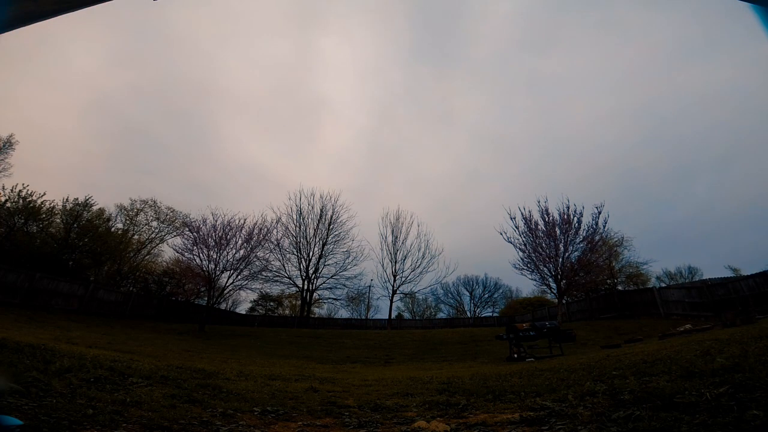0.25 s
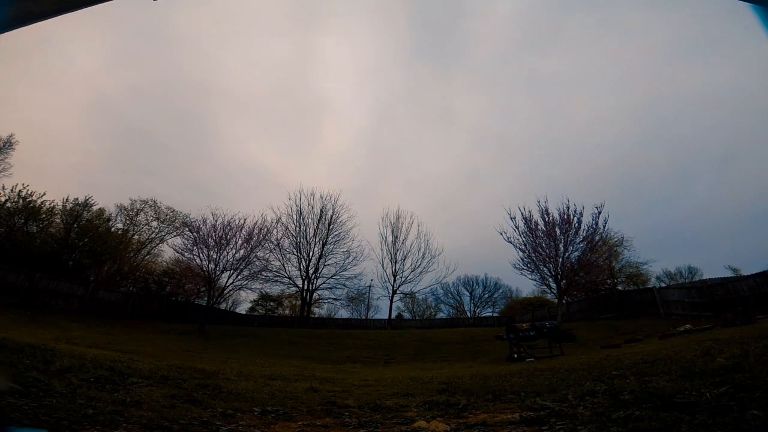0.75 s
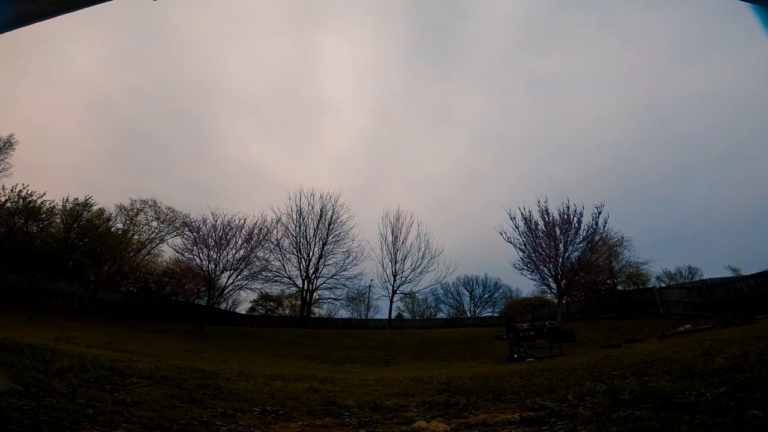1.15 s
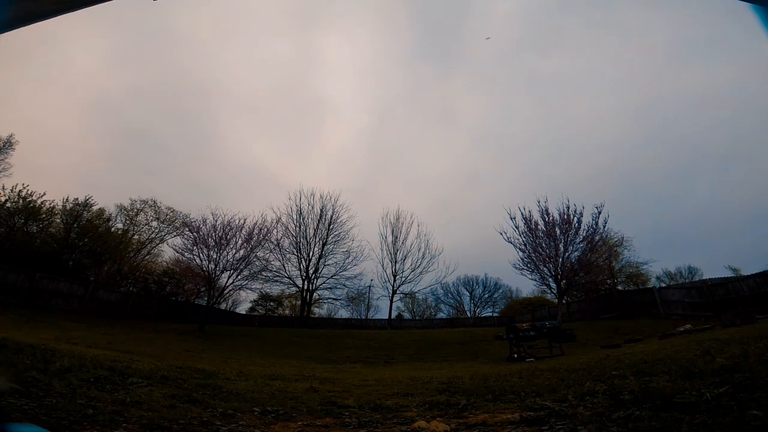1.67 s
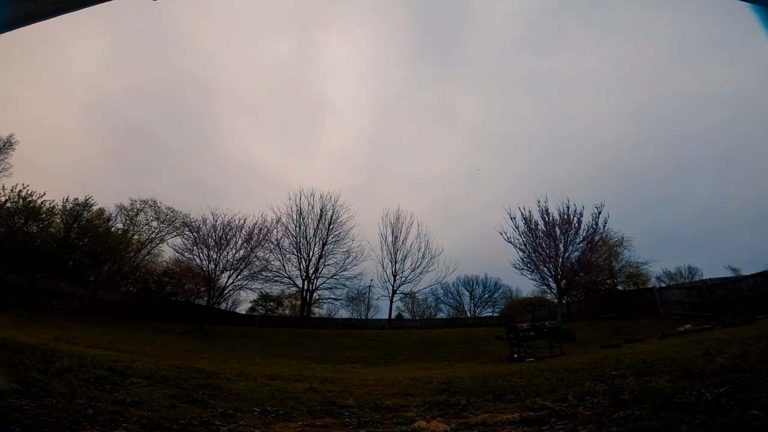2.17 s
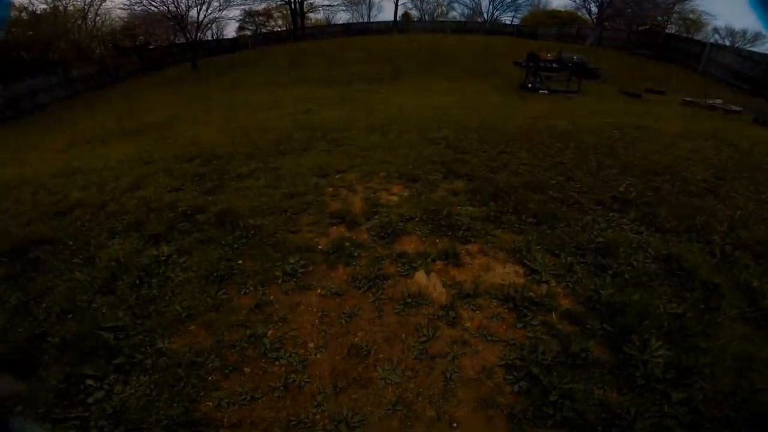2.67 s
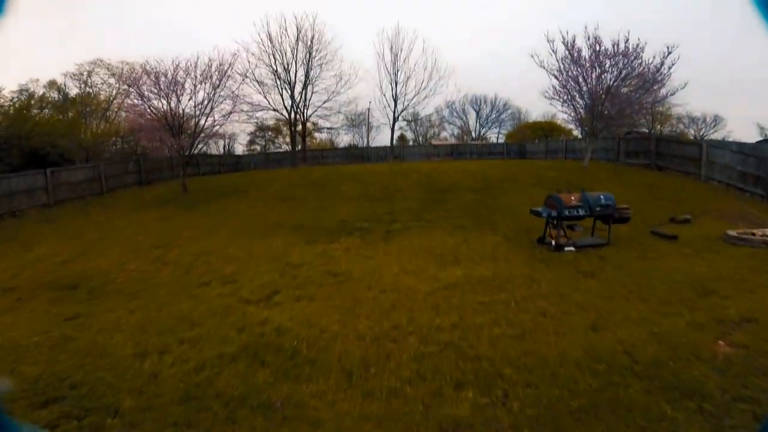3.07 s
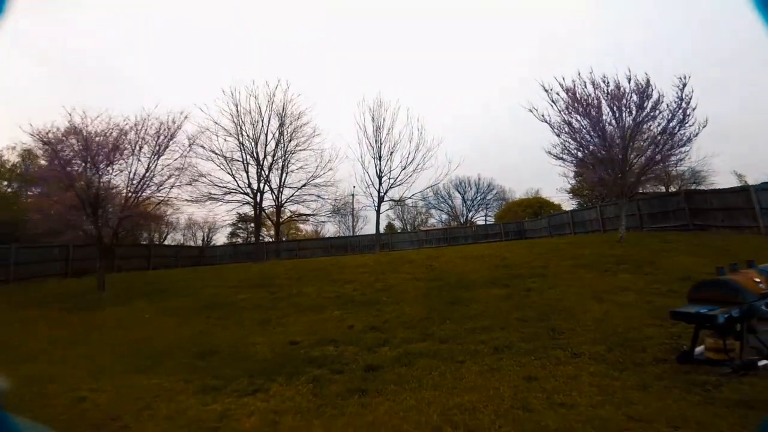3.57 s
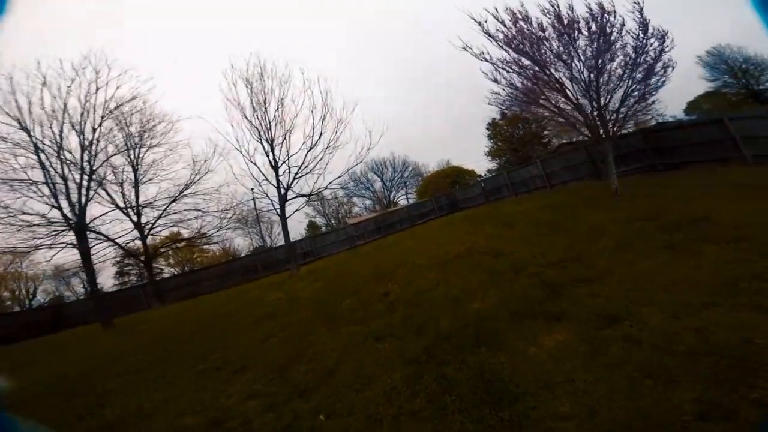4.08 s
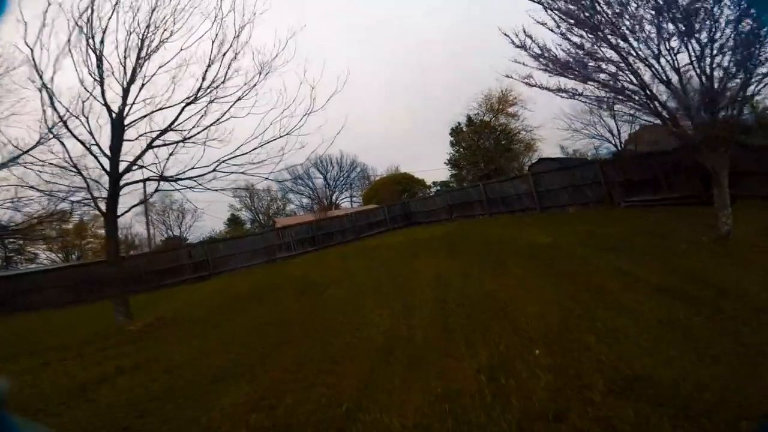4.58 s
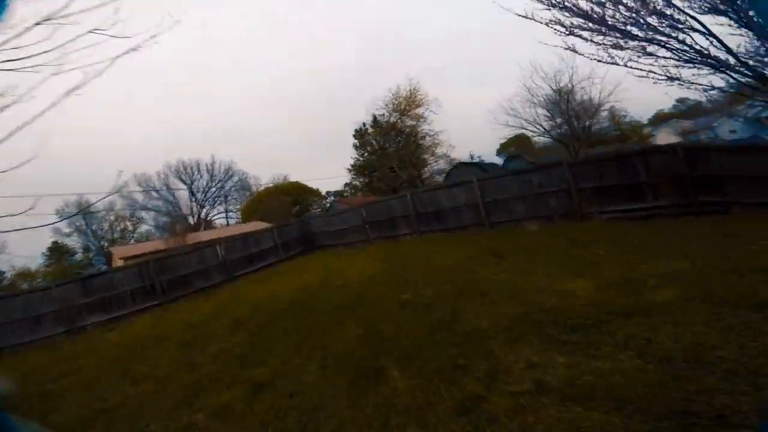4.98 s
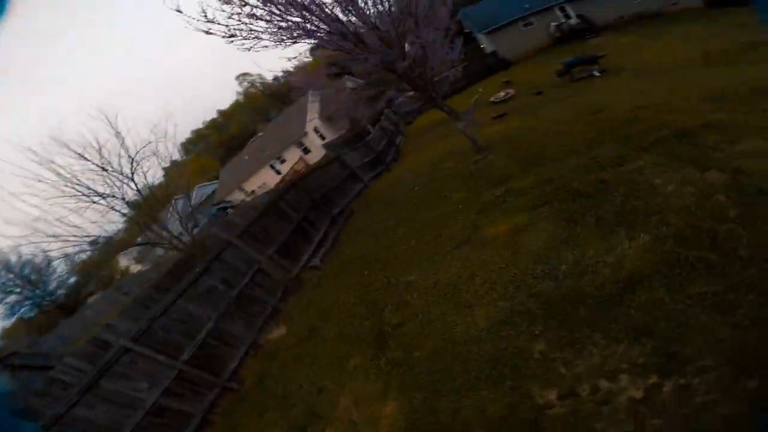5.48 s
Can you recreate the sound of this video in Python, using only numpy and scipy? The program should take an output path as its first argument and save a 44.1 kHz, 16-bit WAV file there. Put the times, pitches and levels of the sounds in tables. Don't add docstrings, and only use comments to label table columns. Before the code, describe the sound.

A small four-rotor drone ticks and squeals to life, rattles at idle on grass, then blasts off into a loud whining, swooping flight.

```python
import sys
import numpy as np
from scipy import signal
from scipy.io import wavfile
from scipy.ndimage import uniform_filter1d, minimum_filter1d

SR = 44100
rng = np.random.default_rng(int(sys.argv[2]) if len(sys.argv) > 2 else 0)


def voltage_ratio(decibels):
    exponent = np.asarray(decibels, float) / 20
    return 10 ** exponent


def store_wav(level_fs):
    pcm = np.round(np.clip(np.atleast_2d(level_fs), -1, 1) * 32767)
    wavfile.write(sys.argv[1], SR, pcm.T.astype(np.int16))


N = 253024
TIME = np.arange(N) / SR
GROUND, FLIGHT = slice(0, int(2.5 * SR)), slice(int(2.2 * SR), N)
LIFT_S = 2.33

# (time [s], nearest shaft [Hz], second shaft [Hz], third shaft [Hz], hum level [dB])
PUNCH_SPEEDS = [
    (2.275, 48, 55, 48, -36),
    (2.328, 100, 185, 140, -18),
    (2.375, 254, 230, 190, -13),
    (2.44, 308, 305, 262, -20),
    (2.505, 319, 345, 299, -14),
    (2.56, 292, 299, 297, -17),
    (2.64, 206, 205, 232, -22),
    (2.7, 185, 185, 222, -11),
    (2.765, 150, 162, 196, -22),
]
# (time [s], shaft speed [Hz], hum level [dB])
NEAR_MOTOR = [(2.845, 235.7, -3), (2.915, 268.9, -20), (3.17, 121.6, -21), (3.34, 196, -14),
              (3.53, 234.3, -7), (3.678, 288.7, -13.5), (3.84, 156, -16), (3.94, 139.1, -36),
              (4.06, 195.8, -6), (4.218, 237, -14), (4.45, 187.6, -15), (4.62, 228.4, -3.5),
              (4.79, 236.5, -20), (5.07, 186, -17.5), (5.2, 228, -11.5), (5.5, 261.8, -26.5),
              (5.57, 235.3, -15), (5.67, 278, -21.5)]
# (time [s], second shaft [Hz], its hum [dB], third shaft [Hz], its hum [dB])
FAR_MOTORS = [(2.9, 236.3, -6.5, 241.3, -30), (3.059, 215.1, -13.5, 171, -12.5),
              (3.19, 135.9, -32, 114.9, -17), (3.36, 224.1, -11, 177.3, -43),
              (3.57, 270.8, -15, 217.3, -37), (3.66, 317.8, -3.5, 265, -31),
              (3.9, 149.5, -16.5, 153.4, -31), (4.05, 200.8, -0.5, 216.7, -42), (4.2, 239.2, -9, 254, -6),
              (4.42, 202.1, -9, 182.6, -17), (4.7, 254.3, -11, 214.7, -17.5), (4.86, 238, -1.5, 249.1, -8),
              (5.0, 218.9, -3, 251.9, -43), (5.15, 243, -11.5, 286.5, -18.5), (5.35, 235.2, -4, 274.9, -20),
              (5.459, 232.1, -14.5, 171.3, -11), (5.61, 237.7, -10.5, 199.8, -13),
              (5.74, 209.3, -8, 163.6, -34)]


def motors():
    near_punch = [(s, near, db) for s, near, second, third, db in PUNCH_SPEEDS]
    far_punch = [(s, second, db + 5.0, third, db - 11.5) for s, near, second, third, db in PUNCH_SPEEDS]
    return curves(near_punch + NEAR_MOTOR) + curves(far_punch + FAR_MOTORS)


BLADES, SWITCHINGS = 4, 42
# (level at hover [dB], shaft speed [dB per octave], speeding up [dB per octave/s],
# full airspeed [dB], lift-off [dB])
BLADE_LAW = (-24.5, 17, 0.66, -9.5, 5)
BITE_LAW = (1.5, -1, 0, -7, 5)
COIL_LAW = (-50.5, 1.5, -0.5, -12.5, 30.5)
# (multiple [1], level [dB], roughness [0-1])
NEAR_OVERTONES = [(2, -20.5, 0.24), (3, -18.5, 0), (5, -36, 0.8), (8, -25.5, 0.45), (12, -29.5, 0.2),
                  (16, -36, 0)]
# (multiple [1], level [dB], roughness [0-1])
FAR_OVERTONES = [(2, -31.5, 0.23), (3, -33, 0), (4, -34, 0.77), (8, -43.5, 0.98), (12, -46, 1),
                 (16, -60.5, 0.5)]
# (time [s], half width [s], level [dB])
HUM_LULLS = [(2.599, 0.019, -6), (2.752, 0.036, -4.5), (3.139, 0.055, -11), (3.581, 0.029, -10),
             (3.851, 0.059, -2.5), (4.029, 0.034, -9.5), (4.231, .025, -6.5), (4.66, 0.033, -11.5),
             (4.82, 0.034, -19.5), (5.09, 0.042, 1), (5.259, 0.033, -4.5)]


def shafts(hz, hum_db, hz_2, hum_2_db, hz_3, hum_3_db):
    blade_db, bite_db, coil_law_db = levels(hz, BLADE_LAW, BITE_LAW, COIL_LAW)
    lull_db = sum(db * bump(s, half_s, half_s) for s, half_s, db in HUM_LULLS)
    hz, hz_2, hz_3 = (speed * (1 + 0.0111 * wander(16.74)) for speed in (hz, hz_2, hz_3))
    blade_tone = voltage_ratio(blade_db) * tone(BLADES * hz, rough=0.13)

    upper = np.zeros(N)
    for k, db, rough in NEAR_OVERTONES:
        level_db = 0.64 * blade_db + db + bite_db * (k > BLADES)
        upper += voltage_ratio(level_db) * tone(k * hz, rough, 10 * k + 40)
    for k, db, rough in FAR_OVERTONES:
        for speed, shake_db in ((hz_2, hum_2_db), (hz_3, hum_3_db)):
            upper += voltage_ratio(db + 0.47 * shake_db) * tone(k * speed, rough, 8 * k + 40)
    housing = voltage_ratio(7.5) * ring(upper, hz=1444, width=130) + voltage_ratio(4.0) * ring(upper, hz=2280, width=300)
    out = blade_tone + upper + housing

    for speed, level_db, coil_db in (hz, hum_db, 0), (hz_2, hum_2_db, -1), (hz_3, hum_3_db, -3):
        out += voltage_ratio(level_db + lull_db) * tone(speed, rough=0.082, flutter_hz=26.9)
        passed = 1 / (1 + (SWITCHINGS * speed / 8800) ** 12)
        coil = tone(SWITCHINGS * speed, rough=0.15, flutter_hz=100)
        out += passed * voltage_ratio(coil_law_db + coil_db) * coil
    return out * gate(2.26, 9, 0.011, 1)


# (hover [dB], shaft speed [dB per octave], speeding up [dB per octave/s], airspeed [dB], lift-off [dB])
WIND_LAW = (-32.5, 15.5, 0.05, 13, 24)
BUZZ_LAW = (-40, -4.5, 0.66, 10.5, 4)
ROAR_LAW = (-34.5, 1, 0, 1.5, 11)
HISS_LAW = (-38, 14, 0.56, 0, 15)
WHISTLE_LAW = (-52, 19, -0.6, 19.5, 12)
# (frequency [Hz], level [dB per Hz])
WIND = [(15, -11.5), (30, -3.5), (70, 3.5), (110, 0.5), (200, 5), (350, -26), (600, -52.5)]
# (frequency [Hz], level [dB per Hz])
BUZZ = [(200, -28), (380, -15.5), (550, 25.5), (800, 9.5), (1100, -6.5), (1400, -31), (1800, -70)]
# (frequency [Hz], level [dB per Hz])
ROAR = [(710, -16), (1200, 6.5), (1300, 6.5), (1630, 0), (2440, 6), (2750, 2), (3460, -16), (4200, -25),
        (5460, -21), (9240, -120)]
# (frequency [Hz], level [dB per Hz])
HISS = [(2000, -20.5), (3400, -5), (4150, -9), (4640, -4.5), (5250, -7.5), (6560, -0.5), (7070, -2.5),
        (9410, -6.5), (12000, -25), (13900, -27.5), (15000, -53)]


def air(hz):
    wind_db, buzz_db, roar_db, hiss_db, whistle_db = levels(
        hz, WIND_LAW, BUZZ_LAW, ROAR_LAW, HISS_LAW, WHISTLE_LAW)
    wind_db = wind_db + 1.8 * wander(4.4)
    buzz_db = buzz_db + 1.9 * wander(3.9)
    wind = voltage_ratio(wind_db + 1.5) * noise(WIND, patchy_db=1.5, flicker_db=1.2, size=2048)
    buzz = voltage_ratio(buzz_db) * noise(BUZZ, patchy_db=2.5, flicker_db=0.8)
    roar = voltage_ratio(roar_db) * noise(ROAR, patchy_db=0.0, flicker_db=2.0)
    hiss = voltage_ratio(hiss_db) * noise(HISS, patchy_db=1.8, flicker_db=0.7)
    whistle = ring(noise(HISS, patchy_db=3.1, flicker_db=0.5), hz=7000, width=2000)
    whistle = voltage_ratio(whistle_db) * evened(ring(whistle, hz=7000, width=2000))
    snaps = (rng.random(N) < 500 / SR) * rng.standard_normal(N) * gate(2.265, 2.39, 0.05, 0.05)
    snaps = signal.sosfilt(signal.butter(6, 7000, fs=SR, output="sos"), snaps)
    crackle = voltage_ratio(-18) * ring(snaps, hz=3600, width=2700) + voltage_ratio(3) * ring(snaps, hz=1800, width=4600)
    gusts = voltage_ratio(0.45 * wander(9.3))
    bright = roar + hiss + whistle + crackle
    return (wind + buzz + gusts * bright) * gate(2.255, 9, 0.014, 1)


# (time [s], share of the fastest [0-1])
AIRSPEED = [
    (2.3, 0),
    (3.9, 0.4),
    (4.6, 0.42),
    (5.2, 0.13),
    (5.5, 0.99),
    (5.74, 0.94),
]


def levels(hz, *laws):
    octaves = np.log2(hz / 230)
    push = np.clip(uniform_filter1d(np.gradient(octaves) * SR, size=1500), -8, 8)
    blast = bump(LIFT_S, rise_s=0.06, fall_s=0.08)
    airspeed = columns(AIRSPEED, 0.1)[0]
    return np.array(laws) @ [np.ones(N), np.maximum(octaves, -1), push, airspeed, blast]


IDLE_SHAFTS = [45.66, 46.08, 46.04, 43.53]
# (frequency [Hz], level [dB])
IDLE_TONES = [(1577, -55.5), (1868, -47), (1900, -45), (2169, -47.5), (2196, -48.5), (3639, -59),
              (3763, -56), (3790, -68), (4231, -66), (4549, -64), (4700, -68.5), (5173, -70), (5685, -82),
              (6110, -68.5), (6368, -68.5), (7278, -66)]
# (frequency [Hz], width [Hz], level [dB])
FRAME = [(169.7, 15.7, 2), (238, 11.9, -2), (263.8, 24, -4.5), (352.8, 10.8, -11.5), (407.3, 21, -12.5),
         (553.5, 92, -6.5), (615.2, 89.5, -5.5), (686.3, 140, -11), (762, 43, -24), (852, 48, -26.5),
         (938, 22, -39), (1300, 65, -23.5)]
# (frequency [Hz], level [dB per Hz])
GRIT = [(530, -35), (900, 6), (1120, -27.5), (1330, -6.5), (1740, -5), (1890, -2.5), (2030, -24),
        (2220, -5), (2680, -11), (3760, -18.5), (4000, -27.5), (4570, -30.5), (7560, -25), (10500, -46.5),
        (13600, -72), (22000, -120)]


def idle():
    speed = 1 - 0.34 * np.exp(-np.maximum(TIME - 0.48, 0) / 0.085)
    start = gate(0.444, 9, 0.008, 1) ** 3
    lift = bump(LIFT_S + 0.023, 0.031, 0.05)
    breeze = bump(1.91, 0.15, 0.15)
    rattle_db = -11 + 10 * lift
    grit_db = -35.5 + 4 * np.exp(-TIME / 0.27) + 22 * lift
    wash_db = -55 + 9 * TIME + 7.7 * breeze + 30.5 * lift

    chatter = voltage_ratio(1.65 * rng.exponential(1, N).clip(0, 5))
    chatter = chatter * (rng.random(N) < 1500 / SR) * rng.choice([-1, 1], N)
    turn_knocks = np.zeros(N)
    for hz in IDLE_SHAFTS:
        shaft_hz = hz * speed * (1 + 0.0309 * wander(22.17))
        turn = np.floor(np.cumsum(shaft_hz) / SR + rng.random())
        turn_knocks += np.diff(turn, prepend=0)
    knocks = chatter + voltage_ratio(4.0 + 2.5 * wander(22)) * turn_knocks
    rattle = sum(voltage_ratio(db) * evened(ring(ring(knocks, hz, 1.4 * w), hz, w)) for hz, w, db in FRAME)
    frame_band = signal.butter(4, [125, 5000], "band", fs=SR, output="sos")
    rattle = signal.sosfilt(frame_band, rattle * start)

    shaken = 1.7 + 0.17 * evened(signal.lfilter([1], [1, -0.994], abs(knocks)))
    grit = evened(shaken * noise(GRIT, patchy_db=1.5, flicker_db=2.0))
    wash_colour = [(15, -9.5), (40, -4.0), (90, -5.5), (120, 7), (170, -35)]  # (Hz, dB per Hz)
    wash = noise(wash_colour, patchy_db=0.0, flicker_db=-10.0, size=2048)

    trimmed = speed * (1 + 0.00109 * wander(7.2))
    tones = sum(voltage_ratio(db + 1.5) * tone(hz * trimmed, rough=0.3, flutter_hz=11, span=GROUND)
                for hz, db in IDLE_TONES)
    body = voltage_ratio(rattle_db) * evened(rattle) + start * (voltage_ratio(grit_db) * grit + voltage_ratio(wash_db) * wash)
    return body * gate(0, 2.45, 0.1, 0.078) + tones * gate(0.436, 2.28, 0.094, 0.017)


# (time [s], peak level [dB], thump against the tick [dB])
TWITCHES = [
    (0.409, -30, 4),
    (0.441, -28, 0),
    (0.449, -30.5, -10),
    (0.454, -18, -10),
    (0.4618, -19, -5),
    (0.4708, -13, -10),
]
# (frequency [Hz], level [dB], t60 [s])
BELL = [(673, 9.5, 0.079), (2180, -12.5, 0.013), (3600, 13.5, 0.011), (4300, 3.5, 0.028), (4300, -4, 0.011),
        (6000, 19, 0.0083), (7500, 14, 0.013)]
# (time [s], grind level [dB], squeal [Hz], squeal level [dB])
CATCH = [
    (.45, -39, 1305, -25),
    (.458, -32, 1324, -28),
    (.47, -42, 1295, -31),
    (.475, -59, 1300, -29),
    (.49, -8, 1280, -16),
    (.51, -73, 1300, -16),
    (.525, -44, 1247, -29.5),
]


def twitches():
    out, t = np.zeros(N), np.arange(3000) / SR
    colour = rng.standard_normal((len(TWITCHES), len(BELL), 2))
    scrape = voltage_ratio(4.5 * wander(900))
    for (s, peak_db, thump_db), chance in zip(TWITCHES, colour):
        for (hz, db, t60), (level_chance, pitch_chance) in zip(BELL, chance):
            low = hz < 1500
            rise = np.minimum(t / (0.007 if low else 0.001), 1) ** 2
            decay = voltage_ratio(db + 5.7 * level_chance + thump_db * low - 60 * t / t60)
            mode = decay * np.sin(2 * np.pi * hz * (1 + 0.076 * pitch_chance) * t)
            roughened = rise * mode * scrape[round(hz):][:len(t)]
            out[round(s * SR):][:len(t)] += voltage_ratio(peak_db - 14.5) * roughened
    grind_db, squeal_hz, squeal_db = columns(CATCH, 0.0065)
    grind = voltage_ratio(grind_db) * noise(HISS, patchy_db=2.5, flicker_db=2.5, size=256)
    squeal = voltage_ratio(squeal_db) * tone(squeal_hz, rough=0.18, span=GROUND)
    return out + (grind + squeal) * gate(0.4495, 0.65, 0.0022, 0.01)


# (frequency [Hz], level [dB per Hz])
QUIET = [(24, -56), (40, -18), (112, -27), (141, 4.5), (178, 3), (484, -16), (641, -14), (847, -18),
         (2910, -26.5), (4750, -41.5), (7070, -27.5), (9130, -26.5), (10500, -33), (13600, -43),
         (22000, -120)]


def yard():
    return voltage_ratio(-50.5) * noise(QUIET, patchy_db=1.2, flicker_db=0.4, size=2048)


def evened(x):
    return x / np.sqrt(np.mean(x ** 2) + 1e-20)


def columns(rows, smooth_s=0.015):
    s, *values = np.transpose(rows)
    return [uniform_filter1d(np.interp(TIME, s, v), int(smooth_s * SR) + 1) for v in values]


def curves(rows):
    s, *values = np.transpose(rows)
    k = np.clip(np.searchsorted(s, TIME) - 1, 0, len(s) - 2)
    h = np.diff(s)[k]
    u, out = np.clip((TIME - s[k]) / h, 0, 1), []
    for v in values:
        d = np.diff(v) / np.diff(s)
        slope = np.pad(2 * np.maximum(d[:-1] * d[1:], 0) / (d[:-1] + d[1:] + 1e-9), 1)
        bend = (1 - u) * (slope[k] - d[k]) + u * (d[k] - slope[k + 1])
        out.append(v[k] + h * u * (d[k] + (1 - u) * bend))
    return out


def gate(start_s, end_s, rise_s, fall_s):
    return np.clip((TIME - start_s) / rise_s, 0, 1) * np.clip((end_s - TIME) / fall_s, 0, 1)


def bump(s, rise_s, fall_s):
    return np.exp(-((TIME - s) / np.where(TIME < s, rise_s, fall_s)) ** 2)


def wander(hz):
    slow = signal.lfilter(*signal.butter(2, 32 * hz / SR), rng.standard_normal(N // 16 + 2))
    return np.interp(np.arange(N) / 16, np.arange(len(slow)), evened(slow))


def tone(hz, rough, flutter_hz=60, span=FLIGHT):
    share, out = np.clip(rough, 0, 1), np.zeros(N)
    turn = 2 * np.pi * (np.cumsum(hz[span]) / SR + rng.random())
    along = np.sqrt(2 - 2 * share) + np.sqrt(share) * wander(flutter_hz)[span]
    across = np.sqrt(share) * wander(flutter_hz)[span]
    out[span] = along * np.cos(turn) + across * np.sin(turn)
    return out


def noise(spectrum, patchy_db, flicker_db, size=512):
    hz, frames = np.fft.rfftfreq(size, 1 / SR), 4 * N // size + 8
    a, b, patches = rng.standard_normal((frames, len(hz), 3)).T
    patches = uniform_filter1d(patches, size=6, axis=0)
    patches = evened(uniform_filter1d(patches, size=16, axis=1))
    flicker = evened(uniform_filter1d(rng.standard_normal(frames), size=4))
    f, db = np.transpose(spectrum)
    colour_db = np.interp(np.log(hz + 1), np.log(f), db, -90, -90)[:, None]
    z = (a + 1j * b) * voltage_ratio(colour_db + patchy_db * patches + flicker_db * flicker)
    return evened(signal.istft(z, nperseg=size, noverlap=3 * size // 4)[1][:N])


def ring(x, hz, width):
    return signal.lfilter(*signal.iirpeak(hz, hz / width, SR), x)


def scene():
    spin = motors()
    mean_hz = np.mean(spin[::2], axis=0)
    flying = shafts(*spin) + air(mean_hz)
    return (voltage_ratio(11.5) * flying + voltage_ratio(9.5) * idle() + twitches() + yard())[None]


def top_cut(x):
    return signal.sosfilt(signal.butter(12, 15130, fs=SR, output="sos"), x)


def record(dry):
    knee_db, duck, recover_db_per_s = -14, 0.6, 45
    power_db = 10 * np.log10(abs(uniform_filter1d(dry[0] ** 2, size=700)) + 1e-12)
    fall = TIME * recover_db_per_s
    held_db = np.maximum.accumulate(power_db + fall) - fall
    over_db = np.maximum(held_db - knee_db, 0)
    dry = dry * voltage_ratio(-duck * uniform_filter1d(over_db, size=400))
    room = np.minimum(0.975 / (abs(dry) + 1e-9), 1)
    gain = uniform_filter1d(minimum_filter1d(room, size=161), size=161)
    mix = dry * gain * gate(-1, N / SR, 1, 0.004)
    return top_cut(mix)


dry = scene()
out = record(dry)
store_wav(out)
```